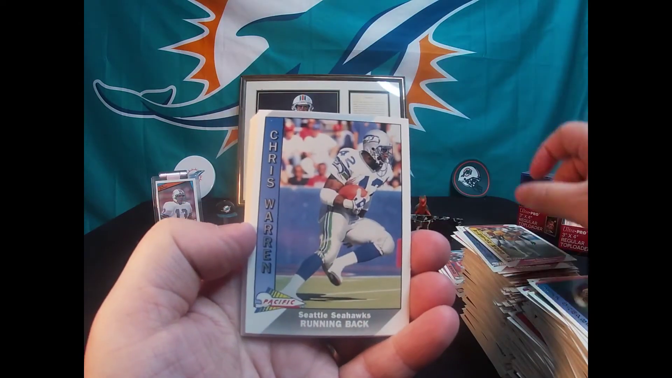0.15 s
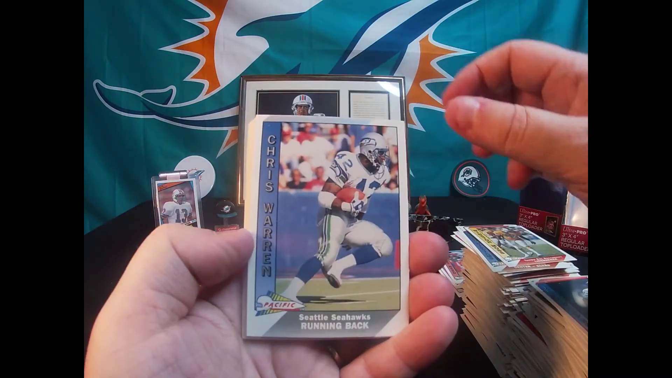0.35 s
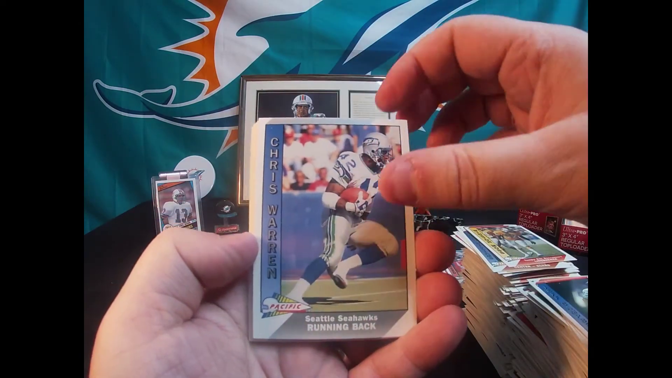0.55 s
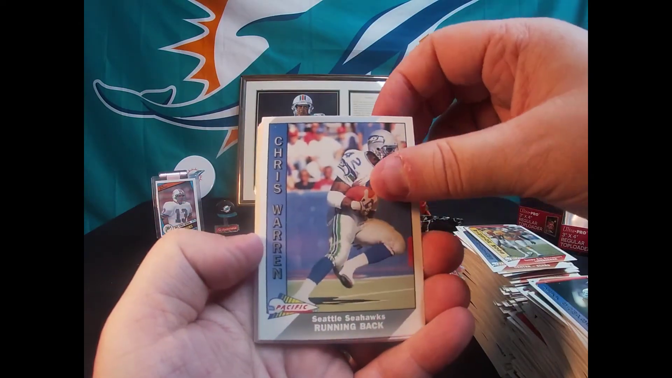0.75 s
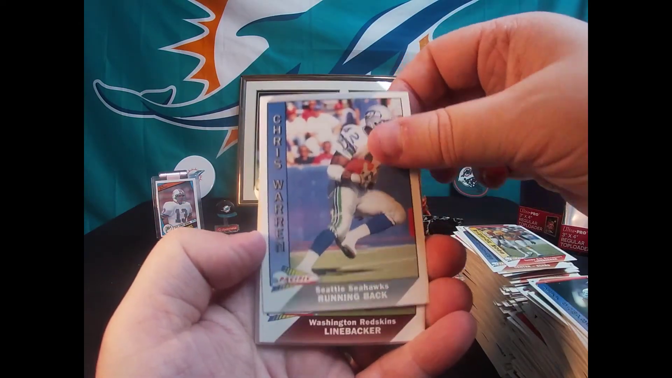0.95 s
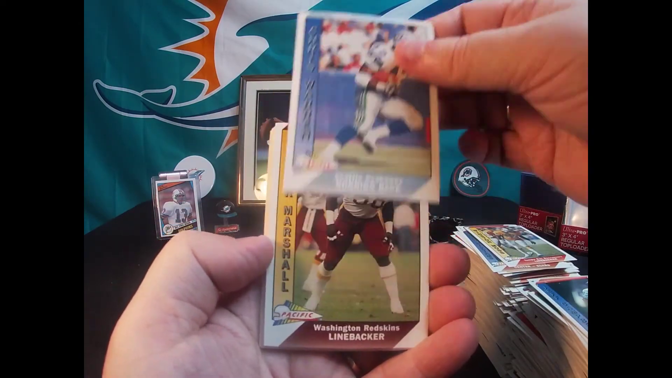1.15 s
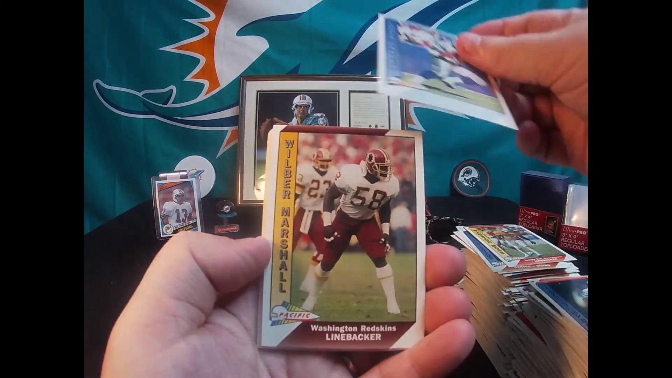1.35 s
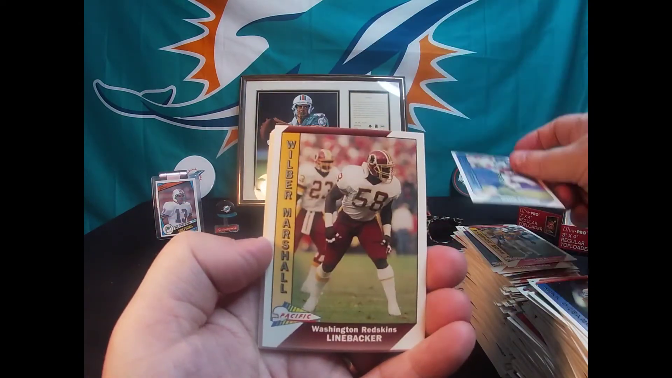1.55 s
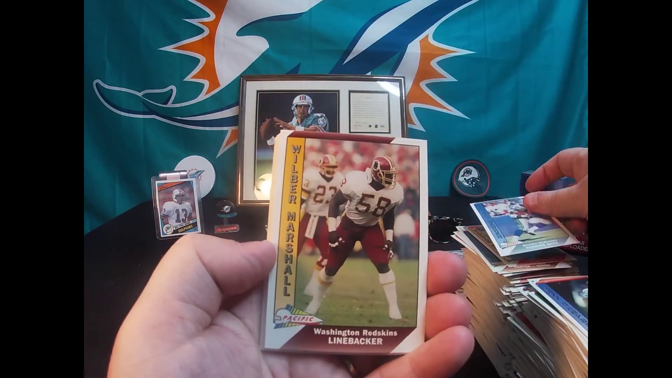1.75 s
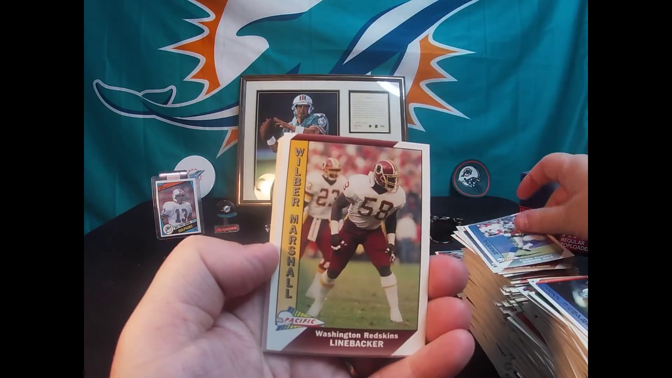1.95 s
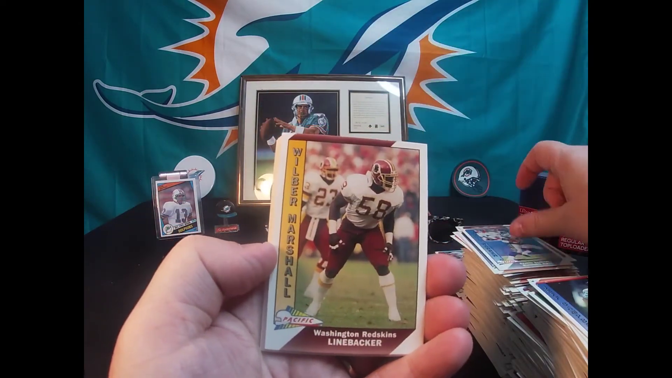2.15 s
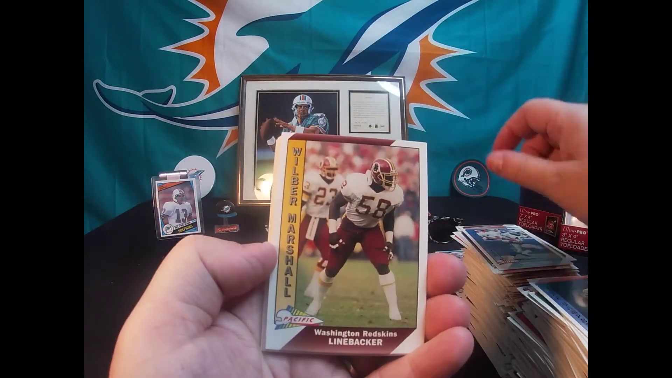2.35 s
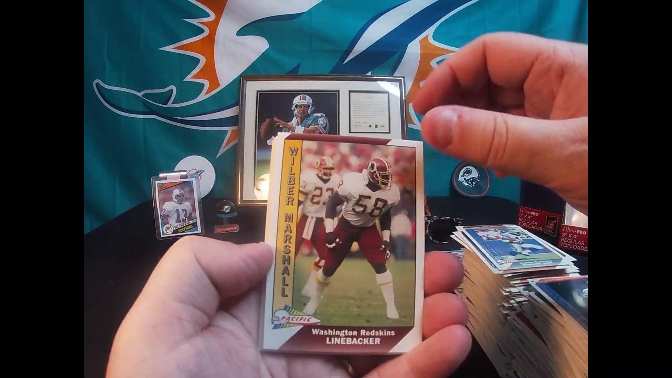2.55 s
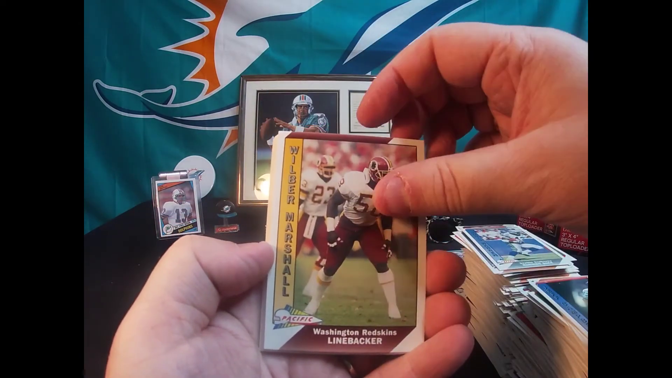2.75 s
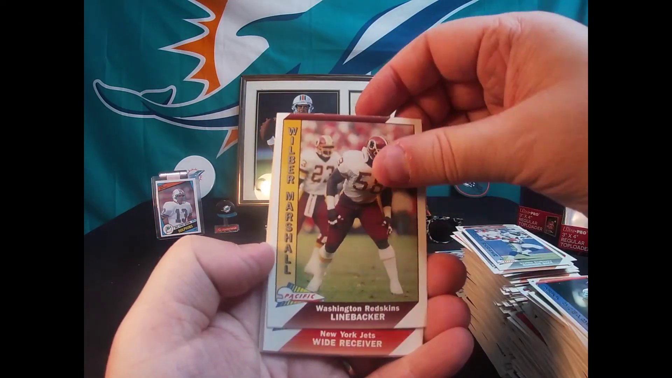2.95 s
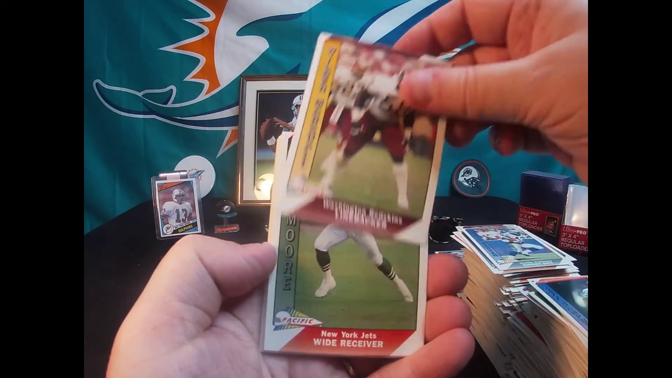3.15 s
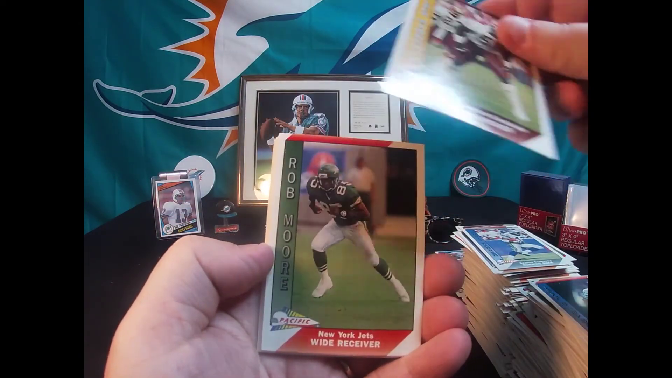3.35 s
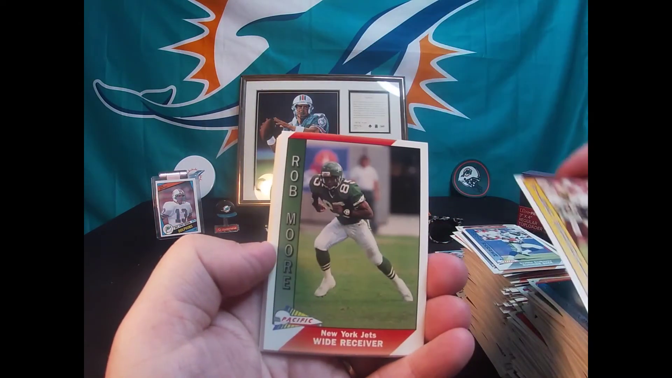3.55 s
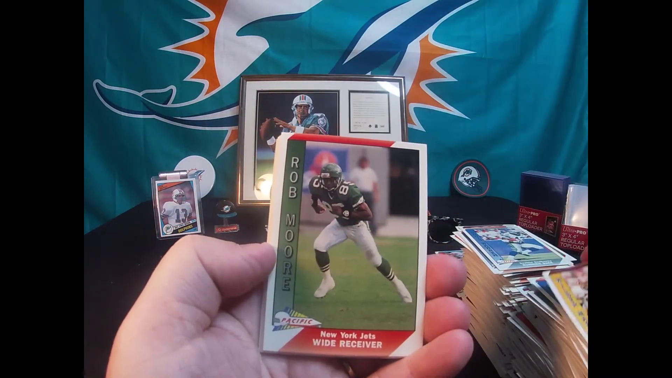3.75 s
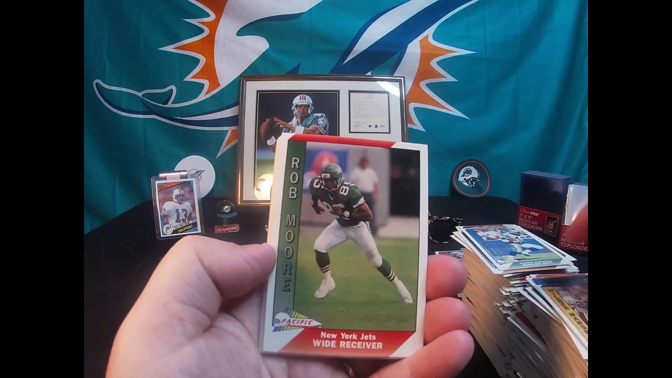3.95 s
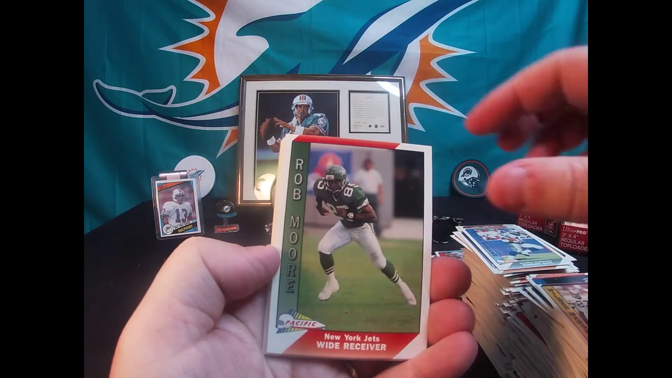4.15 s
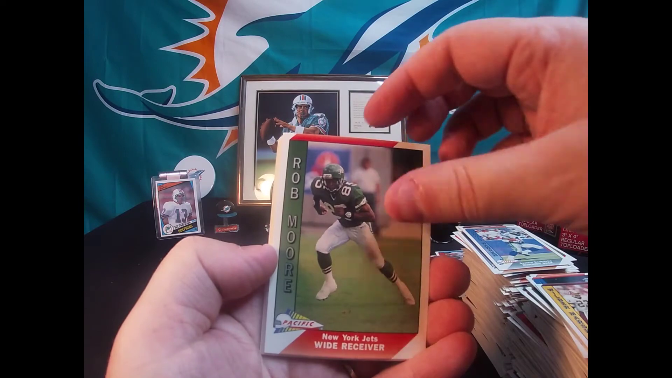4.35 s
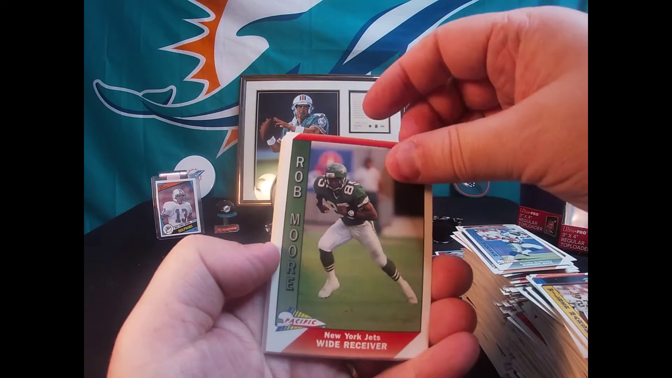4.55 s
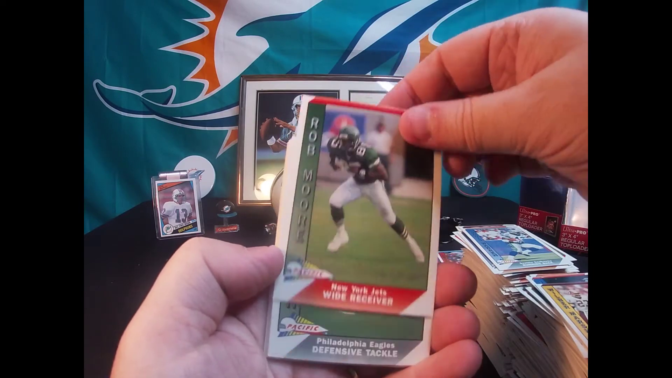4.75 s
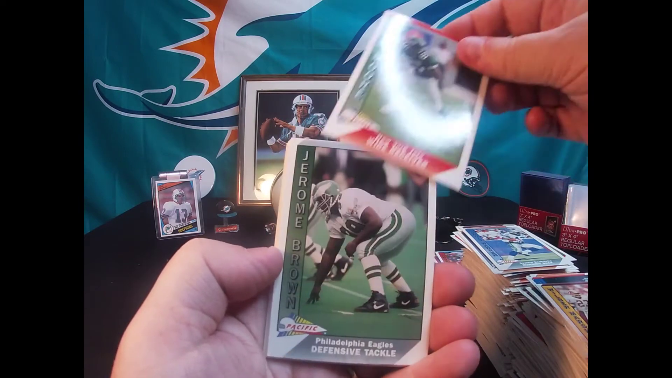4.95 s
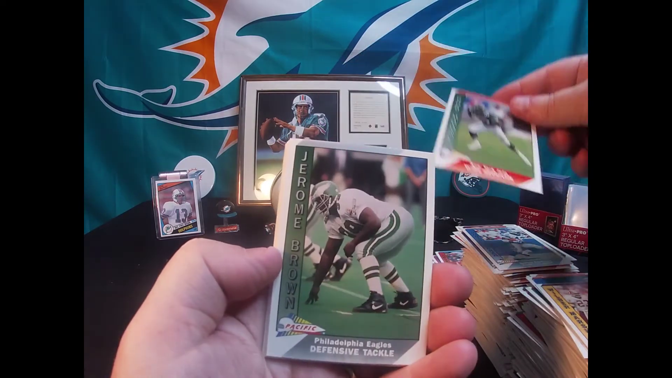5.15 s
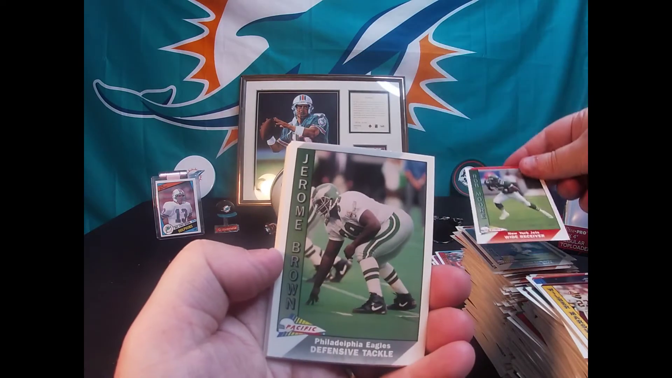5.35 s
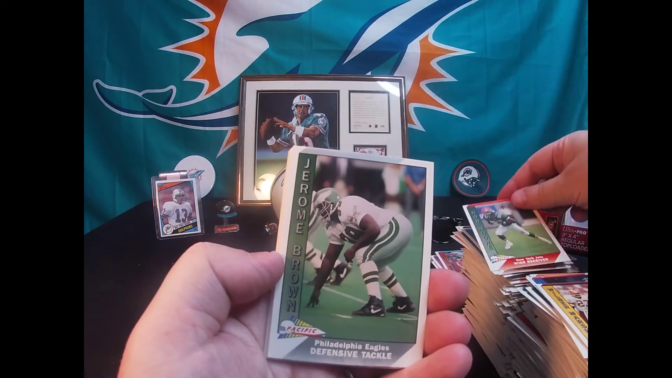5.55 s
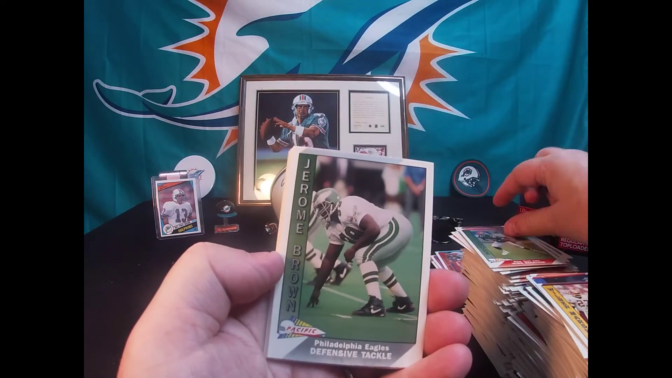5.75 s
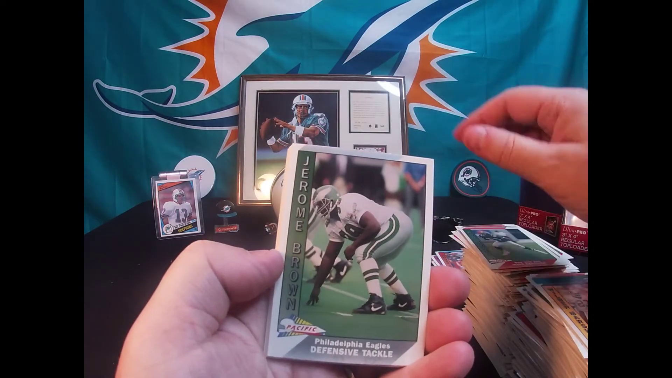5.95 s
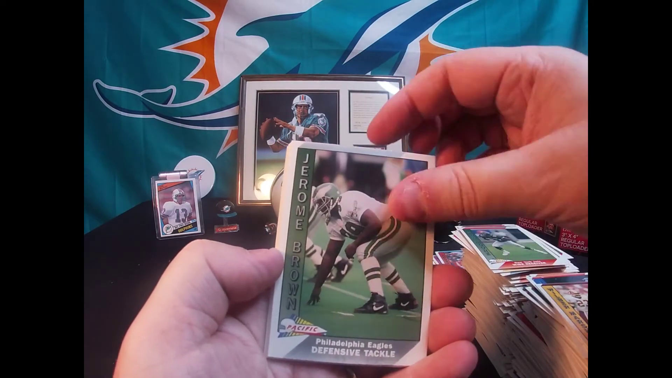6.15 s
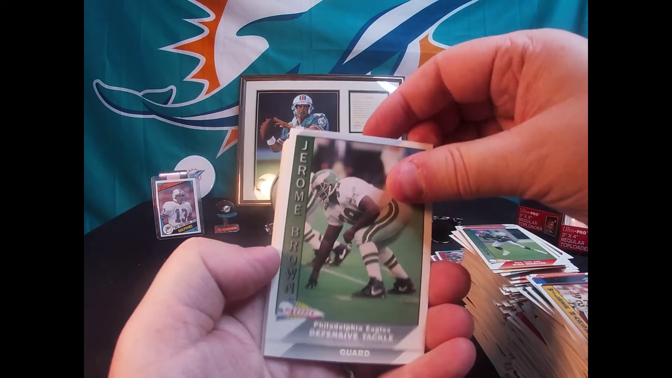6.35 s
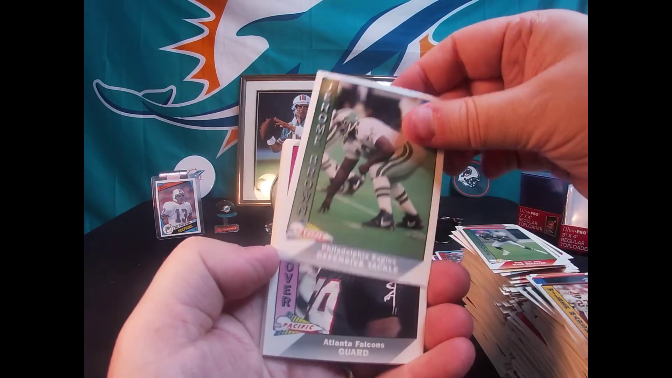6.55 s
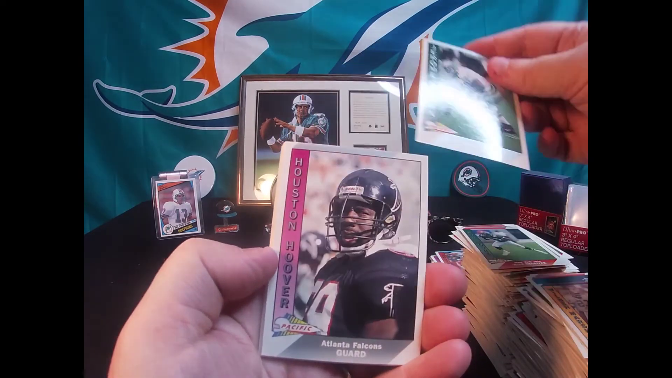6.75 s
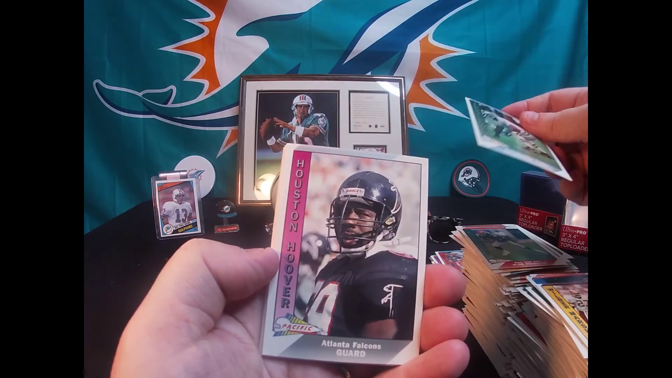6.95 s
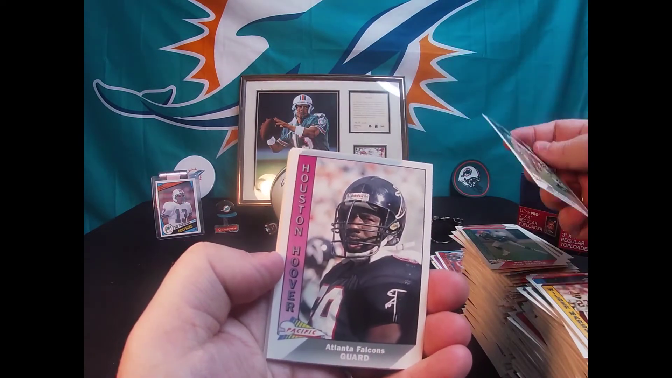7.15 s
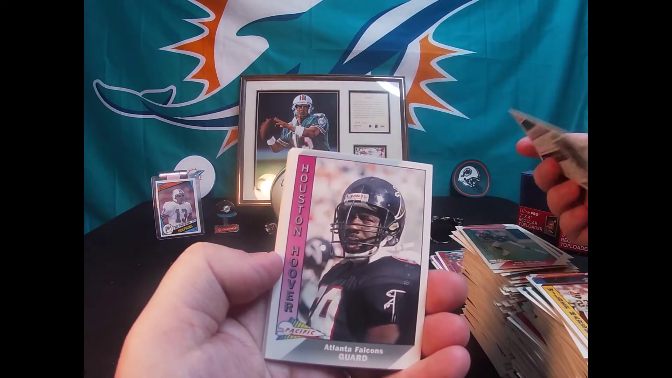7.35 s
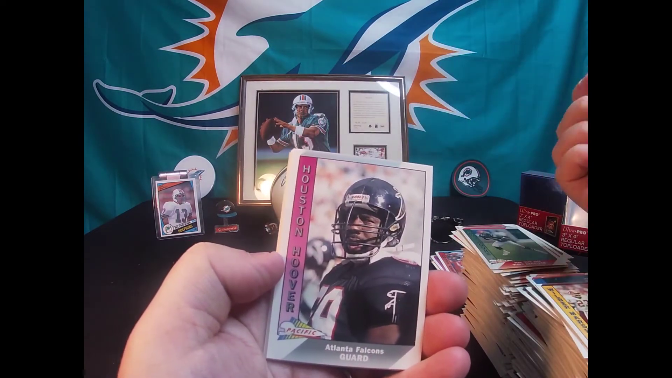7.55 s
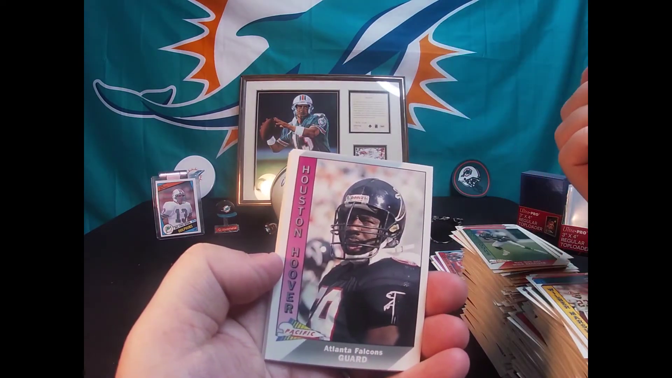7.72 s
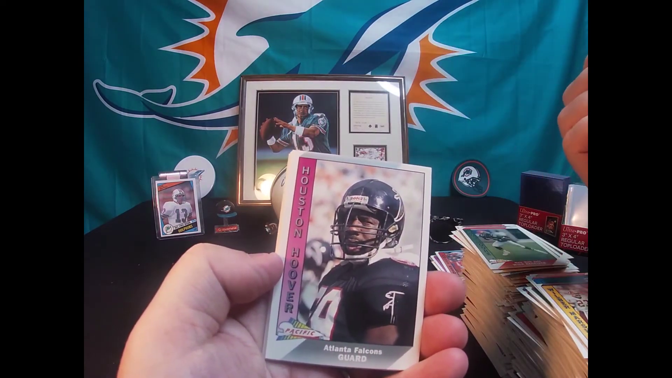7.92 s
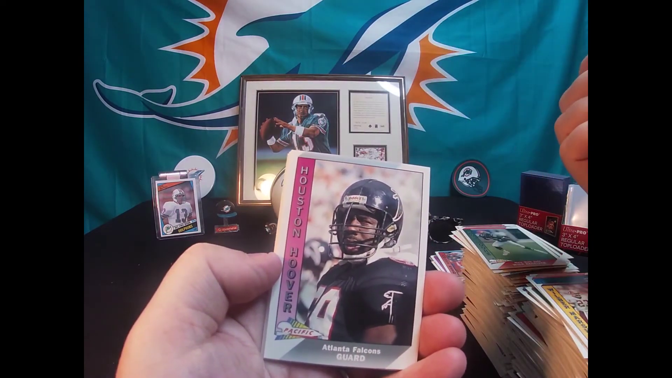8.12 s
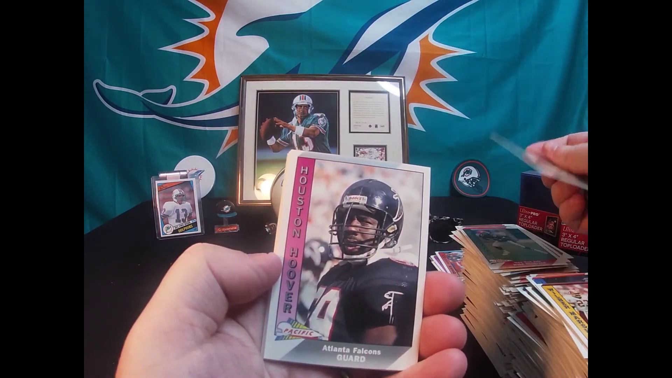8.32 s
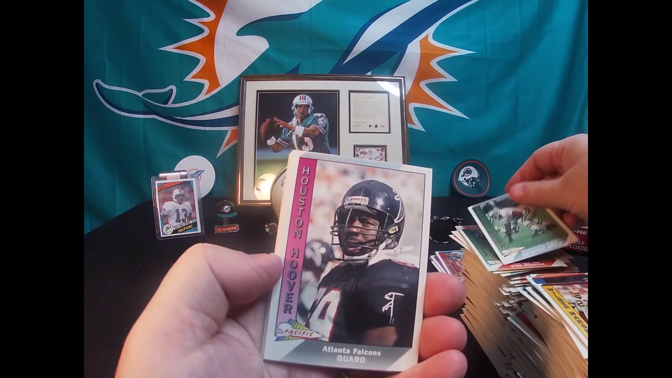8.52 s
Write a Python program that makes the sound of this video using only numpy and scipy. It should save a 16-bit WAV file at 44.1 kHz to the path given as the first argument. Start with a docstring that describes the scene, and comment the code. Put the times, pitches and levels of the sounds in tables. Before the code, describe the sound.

Trading cards are dealt from a hand-held stack, close to the microphone in a small, fairly dry room, with a faint fan running throughout. Right at the start a card snaps sharply onto a pile and thumps the table. Four more are drawn, each sliding over the next with a soft papery hiss and flicking clear, at about 0.9 to 1.4, 3.0 to 3.3, 4.8 to 5.1 and 6.4 to 6.8 seconds; the third slide ends in the brightest flick. Small ticks, edge scrapes, finger rubs and dull bumps follow each draw, with a very faint sleeve rustle as the arm moves. The cards snap down with a low table thud near 2.1, 3.9 and 5.8 seconds, loudest at 3.9. From about 7 seconds there are only light brushes and ticks, until the last card lands with a softer snap at 8.6 seconds.

```python
"""Trading cards dealt from a hand-held stack, close to a mono microphone in a small room.
A fan runs in the background throughout. At once a sleeve rustles and a card snaps down on a pile,
thumping the table. From 0.9 s four more are drawn: each hisses over the next and flicks clear,
fingers tick and brush on it, and it is snapped down, near 2.1, 3.9, 5.8 and, after a wait, 8.6 s."""
import sys
import numpy as np
from scipy import signal
from scipy.fft import rfft, irfft, next_fast_len
from scipy.io import wavfile
from scipy.ndimage import uniform_filter1d

SR = 44100
rng = np.random.default_rng(int(sys.argv[2]) if len(sys.argv) > 2 else 0)


def master_out(mix):
    """Clip the mix to full scale and print it as 16-bit PCM to the path in sys.argv[1]."""
    frames = np.transpose(np.atleast_2d(mix))
    ceiling = np.clip(frames, -1, 1)
    pcm = np.round(ceiling * 32767).astype(np.int16)
    wavfile.write(sys.argv[1], SR, pcm)


N = 382788
TIME = np.arange(N) / SR

# fan heard through its housing: (frequency [Hz], width [Hz], rms level [dB])
FAN_MODES = [(192, 60, -67.5), (785, 100, -73.5), (865, 68, -73.5), (1506, 35, -79.5)]
# room tone, the fan's air and the rumble under it: (frequency [Hz], relative level [dB])
AIR_SPECTRUM = [(20, -22.5), (70, -16.5), (110, -18.5), (170, -13), (380, -19.5), (560, -28.5),
                (1000, -22.5), (1400, -21), (2200, -32.5), (3500, -37.5), (6000, -35.5), (9200, -43),
                (11300, -52.5), (15000, -68)]
RUMBLE_SPECTRUM = [(15, 0.5), (40, 6.5), (65, -3.5), (110, -22), (200, -42), (600, -69.5)]
# moves of the reaching arm: (time of top speed [s], length [s], sleeve level [dB])
REACHES = [(0.065, 0.24, -69), (0.68, 0.29, -74), (1.98, 0.7, -69), (3.36, 0.64, -58.5),
           (4.545, .75, -66.5), (5.88, 0.54, -61.5), (6.337, 0.42, -67.5), (6.78, .2, -63),
           (7.63, 0.76, -67), (8.45, .6, -66)]
# cards meeting the pile: (time [s], skid level [dB], settling level [dB], edge ring [Hz],
# thud level [dB], thud pitch [Hz], rocking level [dB])
LANDINGS = [(0.074, -64, -50.5, 8100, -49, 393, -49), (2.117, -57.5, -62, 6070, -38, 171, -42.5),
            (3.905, -46.5, -52.5, 3770, -29.5, 166, -50.5), (5.758, -63, -49.5, 6600, -34.5, 259.5, -47.5),
            (8.62, -87.5, -55, 2800, -49, 178, -62)]
# short scrapes of card edges and, at 8.1 s, a faint, long hiss near 9 kHz:
# (time of peak [s], length [s], level [dB], ring [Hz])
SCRAPES_AND_HISS = [(0.071, 0.0035, -44, 1800), (1.225, 0.12, -58, 4260), (1.356, 0.028, -53, 1490),
                    (3.189, .02, -53, 4470), (3.266, 0.043, -49.5, 1860), (3.283, .025, -55.5, 3030),
                    (3.487, .04, -54, 1870), (3.483, 0.032, -51.5, 5960), (4.952, 0.029, -48, 5300),
                    (5.032, 0.033, -38.5, 7600), (5.762, .008, -38.5, 765), (5.782, 0.044, -53, 8100),
                    (6.748, 0.065, -53, 6300), (6.764, 0.04, -54, 3400), (7.542, 0.026, -51.5, 2860),
                    (8.1, 0.42, -80, 8960), (8.34, 0.029, -55.5, 5800)]
# cards snapped down: (time [s], level [dB], ring of the bent card [Hz], relative ring level [dB],
# tilt [dB/octave], table knock level [dB], table sway level [dB])
SNAPS = [(0.0739, -24, 2740, 2.5, 1.5, -51, -42.5), (2.117, -32.5, 4080, 7.5, 1.2, -42, -38),
         (2.124, -43, 2780, 17, 3, -74, -39.5), (3.9049, -19, 3100, 1, -1, -33.5, -40.5),
         (3.909, -29.5, 2280, -5.5, -1, -60, -56), (5.7584, -29, 2780, -17.5, 6, -43, -39),
         (5.7627, -33.5, 3300, 6, -1, -46.5, -47), (8.6188, -40.5, 2750, 10.5, -2.5, -52.5, -56)]
# dull low bumps, including the after-thump of a card landing on the pile:
# (time [s], level [dB], pitch [Hz], width [Hz])
KNOCKS = [(0.115, -47, 237, 93), (1.305, -44, 194, 240), (1.599, -54, 74.6, 27), (1.94, -54, 308, 40),
          (2.98, -53.5, 45, 26), (3.301, -52, 228, 69), (3.502, -44.5, 243, 70), (5.11, -48, 188, 80),
          (5.85, -52, 64.9, 28), (6.816, -43, 205, 77), (6.897, -50, 200, 99), (6.979, -53, 32, 13),
          (8.30, -58, 258, 19), (8.57, -54, 176, 30)]
# pushes that draw a card off the stack, a few per card: (start [s], stop [s], attack [s], release [s],
# first level [dB], last level [dB], card body relative to hiss at mid-push [dB])
PUSHES = [(0.88, 0.972, 0.0033, 0.018, -63.5, -70, -12), (0.994, 1.036, .001, .01, -60, -68, -3),
          (1.039, 1.228, 0.009, .02, -51.5, -53.5, -16), (1.251, 1.303, 0.0052, 0.0095, -50, -51, -9.5),
          (1.337, 1.425, .008, 0.019, -57, -61, -24), (2.971, 3.076, 0.013, 0.044, -56.5, -60.5, -8.5),
          (3.125, 3.19, .012, 0.022, -54, -53.5, -6), (3.233, 3.298, 0.0088, 0.0094, -52.5, -46, -6),
          (4.785, 4.969, 0.006, 0.017, -50, -46.5, -4.5),
          (5.004, 5.056, 0.0014, 0.0081, -34.5, -36.5, -10.5),
          (5.063, 5.101, 0.0044, 0.0079, -49, -54.5, 5.5), (6.443, 6.489, 0.0025, .035, -49, -54.5, -7.5),
          (6.56, 6.711, .015, 0.015, -57, -48.5, -1.5), (6.731, 6.817, 0.0048, 0.0095, -56, -68.5, 13.5)]
# card edges and nails catching: (time [s], level [dB], ring [Hz])
TICKS = [(1.2895, -40.5, 5840), (1.300, -47, 2970), (1.955, -63, 2980), (2.031, -59, 1800),
         (2.062, -53, 5300), (3.472, -48, 2000), (3.483, -62, 2600), (3.496, -50, 2100),
         (3.505, -48.5, 2290), (3.765, -52.5, 4070), (3.921, -41, 3800), (4.964, -38.5, 6130),
         (5.007, -39.5, 5300), (5.069, -40.5, 1600), (5.583, -47.5, 2230), (6.814, -46, 2980),
         (6.860, -53, 3700), (6.886, -53.5, 2600), (6.902, -45.5, 2920), (7.142, -50, 2550),
         (7.519, -53, 6000), (8.000, -61.5, 5000)]
# light rubs of fingers and cards: (time of peak [s], length [s], level [dB], tilt [dB/octave])
BRUSHES = [(1.48, .05, -69, 8), (3.384, 0.089, -60, 2), (3.5, 0.037, -55, -2), (3.583, 0.072, -60, 6),
           (3.735, 0.1, -67, .5), (3.83, .12, -65, -4), (4.517, 0.11, -68, 4), (5.201, 0.039, -59.5, -1.5),
           (5.261, 0.066, -65, -2), (5.603, 0.05, -61.5, 3.5), (5.693, 0.11, -60, 2),
           (6.376, 0.29, -69.5, 1), (6.852, 0.024, -57.5, -3.5), (6.886, 0.011, -52, -2.5),
           (6.907, 0.023, -53, -4), (6.984, 0.037, -60.5, -8), (7.129, .08, -59, -0.5),
           (7.46, 0.24, -66.5, 0.5), (7.53, 0.043, -55.5, 0.5), (8.225, 0.064, -68, -3.5),
           (8.343, 0.099, -56, 1.5)]
# resonances of a card and of the table under the pile: (frequency [Hz], width [Hz], gain [dB])
CARD_MODES = [(740, 300, 0.5), (1525, 310, -2), (2030, 700, -4.5), (3030, 440, -2.5), (3800, 920, -2.5),
              (4580, 950, 0.5), (5700, 1400, 0), (6670, 680, 1), (8970, 2500, -6.5)]
TABLE_MODES = [(163, 70, 0.5), (277.6, 76, 5), (401, 36, 3.5), (615.7, 80, -13.5), (779, 77, 2.5),
               (1075, 100, -2.5)]
# tone of each contact and of the room: (frequency [Hz], gain [dB])
RUB_SPECTRUM = [(300, -23.5), (900, -7.5), (2500, 0), (5500, -2), (8600, -7.5), (11000, -18.5),
                (15000, -30)]  # a light rub
CRACK_SPECTRUM = [(200, -3), (600, -2.5), (1500, -1.5), (3000, 1), (6000, -3.5), (9000, -7), (11000, -20),
                  (12700, -16.5), (15000, -23.5)]  # an edge striking
HISS_SPECTRUM = [(900, -20), (1800, -2.5), (2800, 3), (4500, 3), (6500, 0.5), (9600, -2.5), (11300, -9.5),
                 (15000, -9)]  # card sliding over card
BODY_SPECTRUM = [(350, -29), (700, -3.5), (1100, 6), (1700, 8), (2500, 9.5), (4000, 3), (9000, -23)]  # the card flexing
ECHO_SPECTRUM = [(60, 5.5), (250, 0), (800, -5.5), (1600, -5.5), (4000, -9.5), (9000, -9.5), (15000, -5.5)]  # reflections reaching the microphone


def undb(db):
    """Decibels to gain."""
    return 10 ** (np.asarray(db) / 20)


def unit(x):
    """Scale to rms 1."""
    return x / np.sqrt(np.mean(x ** 2))


def unit_at_peak(x, window):
    """Scale to rms 1 over the loudest window of samples."""
    return x / np.sqrt(uniform_filter1d(x ** 2, size=window).max())


def add(track, start_s, sound):
    """Mix a sound into a track."""
    i = int(start_s * SR)
    part = sound[max(-i, 0):N - i]
    track[max(i, 0):max(i, 0) + len(part)] += part


def colour(x, spectrum, tilt_db=0):
    """Filter by a spectrum, tipped by tilt_db an octave between 1 and 16 kHz."""
    size = next_fast_len(len(x))
    octave = np.log2(np.maximum(np.fft.rfftfreq(size, 1 / SR), 10) / 4000)
    hz, db = np.transpose(spectrum)
    gain_db = np.interp(octave, np.log2(hz / 4000), db) + tilt_db * np.clip(octave, -2, 2)
    return irfft(rfft(x, size) * undb(gain_db), size)[:len(x)]


def band(x, hz, width):
    """One resonance, gain 1 at its centre."""
    return signal.lfilter(*signal.iirpeak(min(hz, SR / 3), hz / width, fs=SR), x)


def noise_band(hz, width):
    """Noise passed twice through one resonance; rms 1."""
    return unit(band(band(rng.standard_normal(N), hz, width), hz, width))


def ring(x, modes):
    """A body's resonances; neighbouring modes swing in opposite senses."""
    return sum((-1) ** k * undb(db) * band(x, hz, width) for k, (hz, width, db) in enumerate(modes))


def wander(rate_hz):
    """Smooth random drift with rms 1."""
    hold = int(SR / rate_hz)
    steps = np.repeat(rng.standard_normal(N // hold + 1), hold)[:N]
    return unit(uniform_filter1d(steps, hold))


def swell(peak_s, rise_s, fall_s, shape=1.3):
    """The samples that a short move covers, and its force over them."""
    span = (TIME > peak_s - 4 * rise_s) & (TIME < peak_s + 5 * fall_s)
    t = TIME[span] - peak_s
    return span, np.exp(-np.abs(t / np.where(t < 0, rise_s, fall_s)) ** shape)


def stroke(peak_s, length_s, rise_share=.33):
    """A swell that rises faster than it falls."""
    return swell(peak_s, rise_share * length_s, (1 - rise_share) * length_s)


def fan():
    """In the background, a fan's roar and housing resonances over soft hiss and uneven rumble."""
    air = unit(colour(rng.standard_normal(N), AIR_SPECTRUM)) * undb(-66 + .74 * wander(rate_hz=6))
    for hz, width, db in FAN_MODES:
        air += noise_band(hz, width) * undb(db + .74 * wander(rate_hz=2.8))
    rumble = unit(colour(rng.standard_normal(N), RUMBLE_SPECTRUM))
    return air + rumble * undb(-63.5 + 1.1 * wander(rate_hz=9.3))


def sleeve():
    """Dull rustle of cloth that swells and fades with each move of the arm."""
    speed = np.zeros(N)
    for s, length, db in REACHES:
        span, force = swell(s, length / 2, length / 2)
        speed[span] += undb(db) * force
    return noise_band(hz=305, width=170) * speed * undb(.91 * wander(rate_hz=17))


def friction(grain_db, catch_db):
    """Paper fibres let go in tiny uneven slips, bunched where the card catches; they ring the card."""
    catch = np.minimum(wander(rate_hz=140), 1.5)
    slips = rng.standard_normal(N) * undb(grain_db * wander(rate_hz=2500) + catch_db * catch)
    # the contact point travels, so each mode comes and goes
    return ring(slips, [(hz, width, db + 1.2 * wander(rate_hz=22)) for hz, width, db in CARD_MODES])


def narrow(slips, hz):
    """Grainy noise heard through one resonance; rms 1."""
    width = 690 * np.sqrt(hz / 3000)
    return unit(band(band(slips, hz, width), hz, 2 * width))


def knock(hz, width_hz):
    """A soft push on one damped mode; rms near 1 at its top."""
    t = np.arange(SR // 3) / SR
    swing = np.sin(2 * np.pi * hz * t) * np.exp(-np.pi * width_hz * t) * (1 - np.exp(-t * hz))
    return np.sqrt(2) * swing / np.abs(swing).max()


def landings():
    """A card skids in, thuds on the pile, rocks it and slides to rest with its edge ringing."""
    rub, out = friction(grain_db=2.5, catch_db=3.7), np.zeros(N)
    for s, skid_db, settle_db, ring_hz, thud_db, thud_hz, rock_db in LANDINGS:
        span, force = swell(s - .008, rise_s=.045, fall_s=.018, shape=.91)
        skid = unit(colour(rub[span], RUB_SPECTRUM, tilt_db=-.3))
        out[span] += undb(skid_db) * force * skid
        add(out, s + .004, undb(thud_db) * knock(thud_hz, width_hz=61))
        add(out, s + .028, undb(rock_db) * knock(hz=60, width_hz=33))
        span, force = swell(s + .046, rise_s=.036, fall_s=.028, shape=1)
        slide = unit(colour(rub[span], RUB_SPECTRUM, tilt_db=.2))
        out[span] += undb(settle_db) * force * (slide + undb(-8) * narrow(rub[span], ring_hz))
    return out


def scrapes_and_hiss():
    """Short edge scrapes, each ringing one resonance, and a faint, long hiss near 9 kHz."""
    slips, out = friction(grain_db=-.5, catch_db=4.5), np.zeros(N)
    for s, length, db, hz in SCRAPES_AND_HISS:
        span, force = stroke(s, length)
        out[span] += undb(db) * force * narrow(slips[span], hz)
    return out


def crack(hz, tilt_db, rise_s, fall_s, ring_db, width_hz):
    """An edge skids for a moment and strikes, 20 ms in; rms 1 over its loudest 3 ms."""
    t = np.arange(4096) / SR - .02
    contact = np.exp(-np.abs(t / np.where(t < 0, rise_s, fall_s)))
    skid = rng.standard_normal(len(t))
    for _ in range(2):  # a hard contact excites all pitches alike
        skid = irfft(np.exp(1j * np.angle(rfft(skid * contact))))
    # a tighter bend stiffens the card and lifts all its modes a little
    lift = (hz / 3000) ** .1
    bent_modes = [(mode_hz * lift, .99 * width, db) for mode_hz, width, db in CARD_MODES]
    card = ring(skid * np.sqrt(contact), bent_modes)
    card += undb(ring_db) * band(card, hz, width_hz)
    return unit_at_peak(colour(card, CRACK_SPECTRUM, tilt_db), window=132)


def table_thump(travel_s):
    """A bending wave crosses the table, low notes last; travel_s is its travel time at 100 Hz."""
    hz = np.fft.rfftfreq(16384, 1 / SR)
    wave = irfft(np.exp(-2j * np.pi * 20 * travel_s * np.sqrt(hz)))
    return unit_at_peak(ring(wave, TABLE_MODES), window=441)


def snaps():
    """The bent card slips off the thumb, slaps the pile and shakes the table."""
    out = np.zeros(N)
    thump, sway = table_thump(travel_s=.009), knock(hz=65, width_hz=37)
    for s, db, hz, ring_db, tilt_db, knock_db, sway_db in SNAPS:
        slap = crack(hz, tilt_db, rise_s=.0024, fall_s=.0026, ring_db=ring_db, width_hz=370)
        add(out, s - .02, undb(db) * slap)
        add(out, s + .00092, undb(knock_db) * thump)
        add(out, s + .0032, undb(sway_db) * sway)
    return out


def knocks():
    """Dull low bumps, including the after-thump of a card landing on the pile."""
    out = np.zeros(N)
    for s, db, hz, width_hz in KNOCKS:
        add(out, s, undb(db) * knock(hz, width_hz))
    return out


def pulls(speed_up_power=1.4, ease_db_per_s=9.5, body_rise_db=10):
    """A card hisses over the stack, gathering speed; as the overlap shrinks its body sounds more."""
    hiss = unit(colour(friction(grain_db=1.5, catch_db=1.33), HISS_SPECTRUM))
    body = unit(colour(friction(grain_db=2, catch_db=1.5), BODY_SPECTRUM))
    out = np.zeros(N)
    for start, stop, attack, release, first_db, last_db, body_db in PUSHES:
        span = (TIME > start - 6 * attack) & (TIME < stop + 6 * release)
        t, length = TIME[span] - start, stop - start
        progress = np.clip(t / length, 0, 1)
        db = first_db + (last_db - first_db) * progress ** speed_up_power
        db -= ease_db_per_s * length * np.sin(np.pi * progress)  # friction eases midway in a long push
        fade_in = 1 / (1 + np.exp(-t / attack))
        fade_out = np.exp(-np.maximum(t - length, 0) / release)
        body_gain = undb(body_db + body_rise_db * (progress - .5))
        out[span] += undb(db) * fade_in * fade_out * (hiss[span] + body_gain * body[span])
    return out


def ticks():
    """Small dry catches of a card's edge, softened by the skin that holds it."""
    out = np.zeros(N)
    for s, db, hz in TICKS:
        tick = crack(hz, tilt_db=.5, rise_s=.0008, fall_s=.0035, ring_db=2.5, width_hz=550)
        add(out, s - .019, undb(db) * tick)
    return signal.sosfilt(signal.butter(2, 8000, fs=SR, output="sos"), out)


def brushes():
    """Fingers and cards rub lightly, in short strokes that swell and die away."""
    rub, out = friction(grain_db=1, catch_db=3), np.zeros(N)
    for s, length, db, tilt_db in BRUSHES:
        span, force = stroke(s, length)
        out[span] += undb(db) * force * unit(colour(rub[span], RUB_SPECTRUM, tilt_db))
    return out


def room(direct, wet_db, t60_s, wall_s, near_db):
    """Close up, the direct sound leads; weak echoes follow from things on the table, then the walls."""
    t = np.arange(SR // 2) / SR
    walls = undb(-60 * np.abs(t - wall_s) / np.where(t < wall_s, t60_s * .6, t60_s))
    nearby = undb(near_db) * np.exp(-t / .0082)
    echoes = colour(rng.standard_normal(len(t)) * (walls + nearby) * (t > .002), ECHO_SPECTRUM)
    echoes /= np.sqrt(np.sum(echoes ** 2))
    return direct + undb(wet_db) * signal.fftconvolve(direct, echoes)[:N]


def scene():
    """One microphone close to the cards, the fan behind; the same in both channels."""
    cards = landings() + scrapes_and_hiss() + snaps() + knocks() + pulls() + ticks() + brushes()
    mono = fan() + sleeve() + room(cards, wet_db=-12, t60_s=.24, wall_s=.042, near_db=13.5)
    return np.array([mono, mono])


def record(dry):
    """The recorder cuts the treble steeply above 15.5 kHz."""
    return signal.sosfilt(signal.ellip(8, .2, 70, 15500, fs=SR, output="sos"), dry)


dry = scene()
out = record(dry)
master_out(out)
```